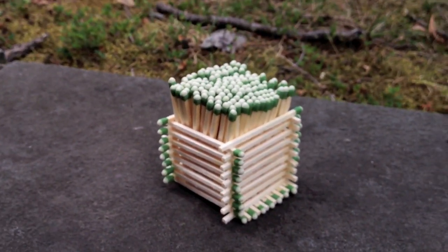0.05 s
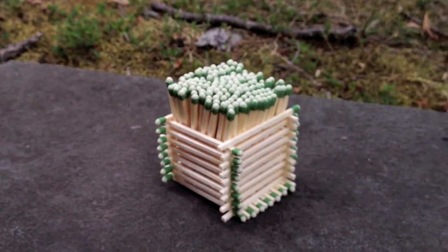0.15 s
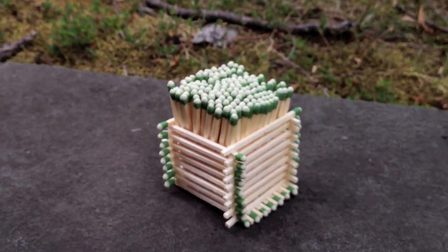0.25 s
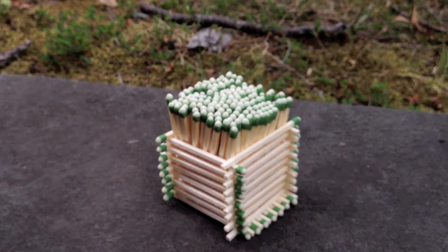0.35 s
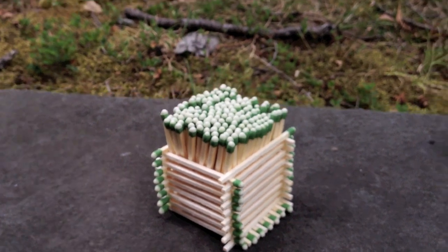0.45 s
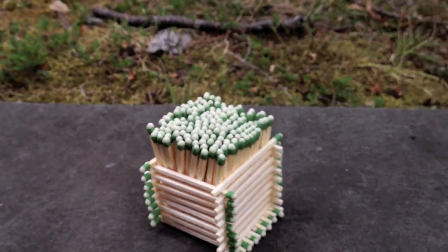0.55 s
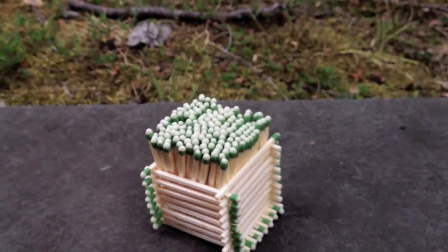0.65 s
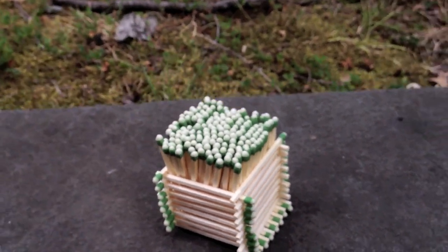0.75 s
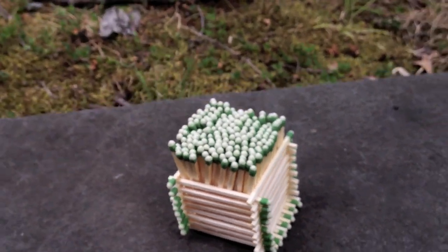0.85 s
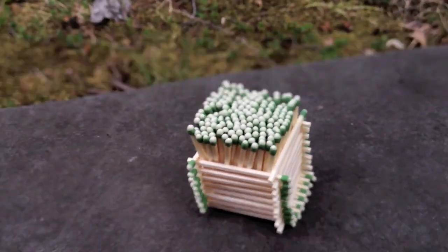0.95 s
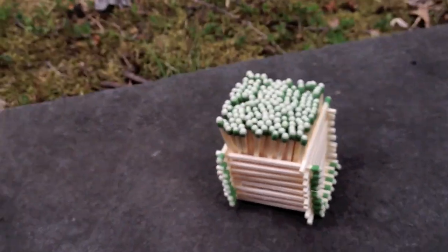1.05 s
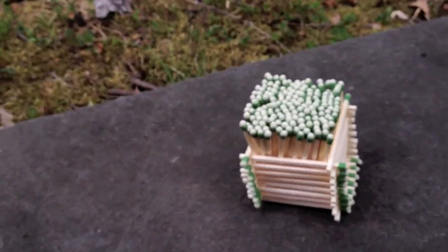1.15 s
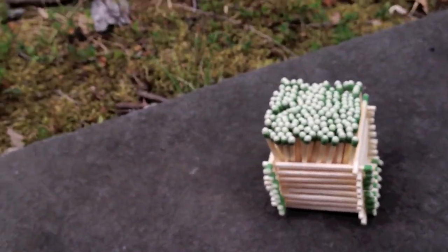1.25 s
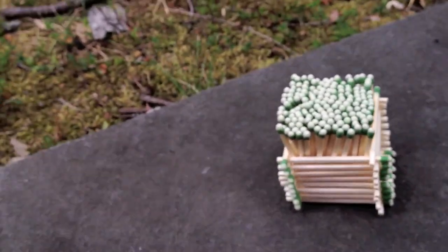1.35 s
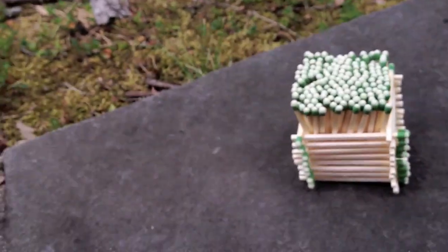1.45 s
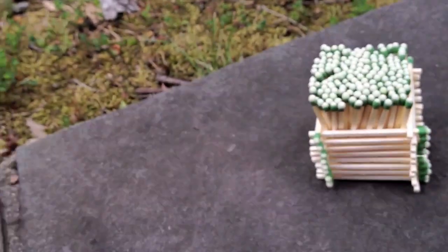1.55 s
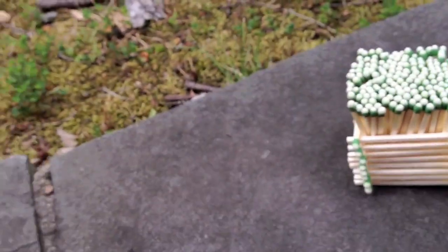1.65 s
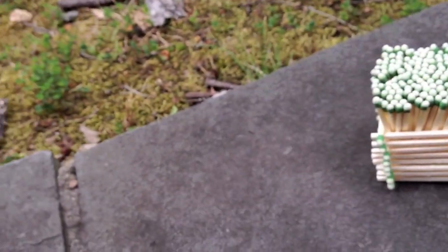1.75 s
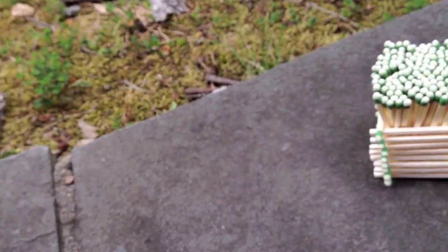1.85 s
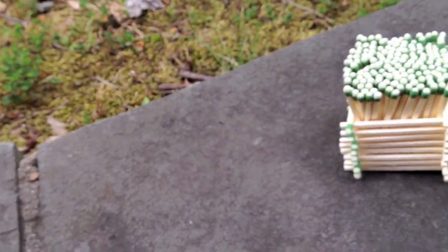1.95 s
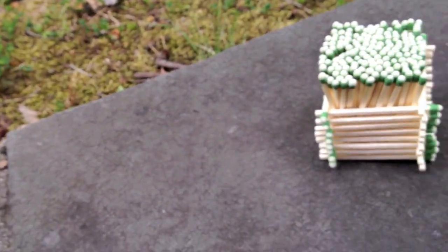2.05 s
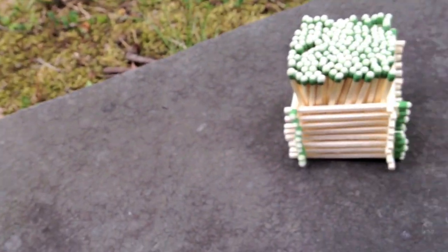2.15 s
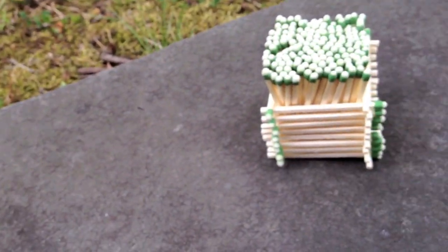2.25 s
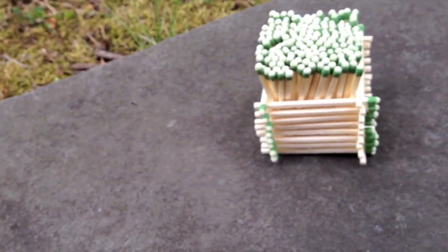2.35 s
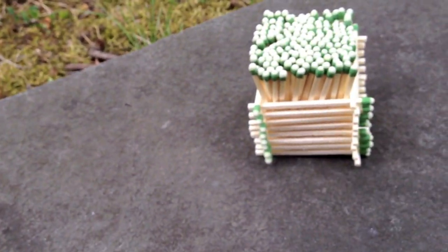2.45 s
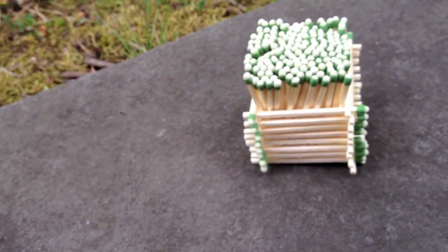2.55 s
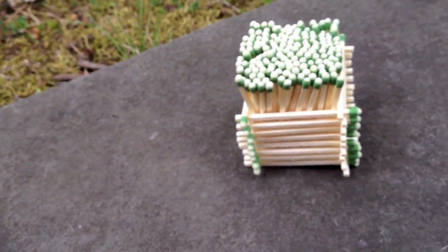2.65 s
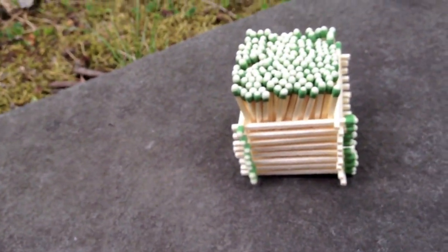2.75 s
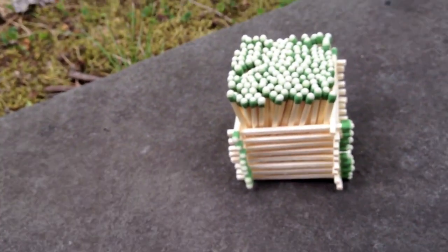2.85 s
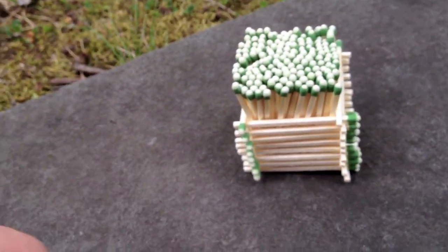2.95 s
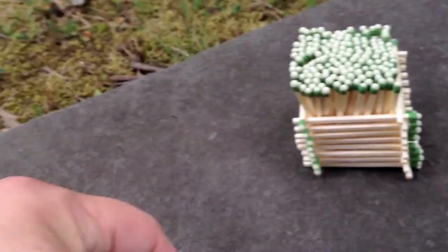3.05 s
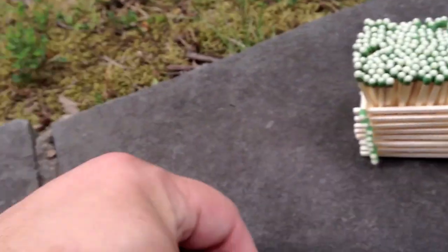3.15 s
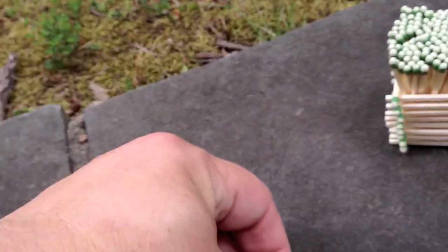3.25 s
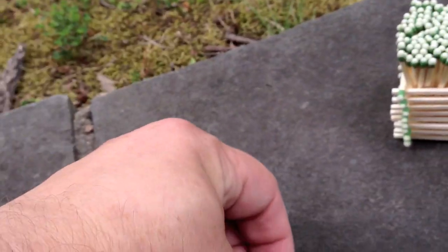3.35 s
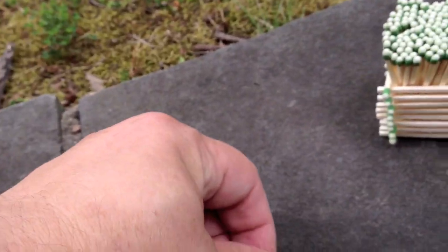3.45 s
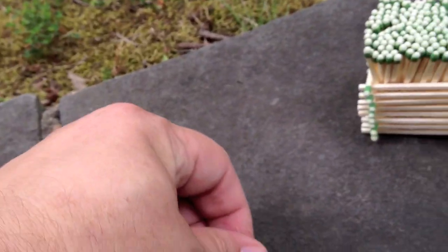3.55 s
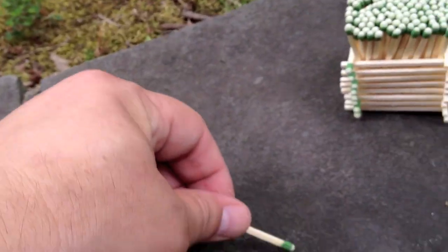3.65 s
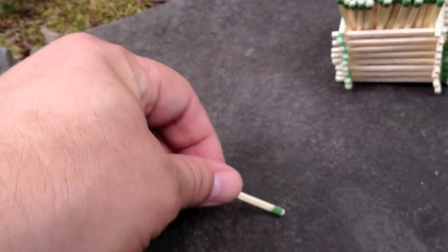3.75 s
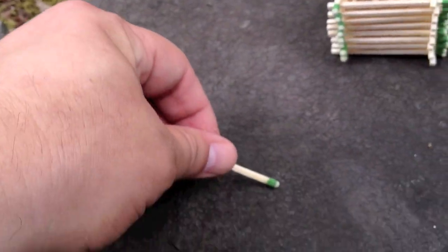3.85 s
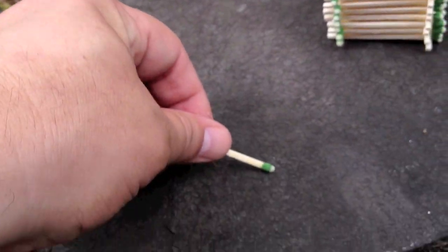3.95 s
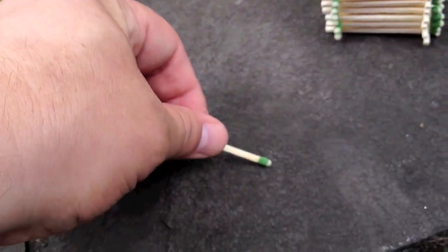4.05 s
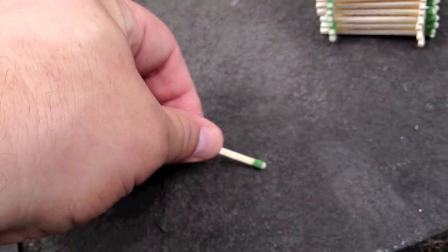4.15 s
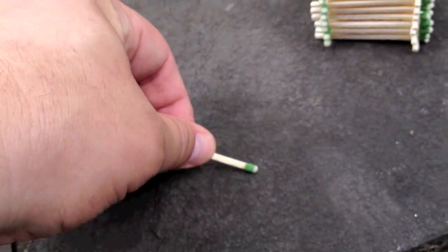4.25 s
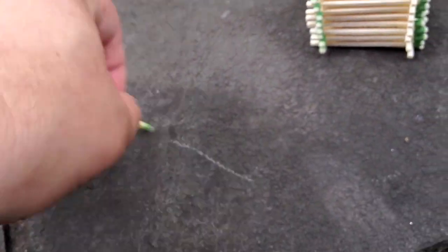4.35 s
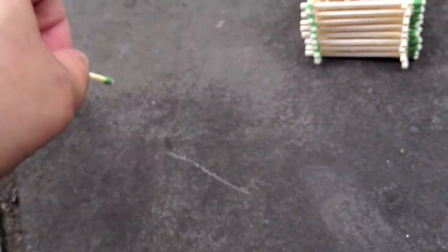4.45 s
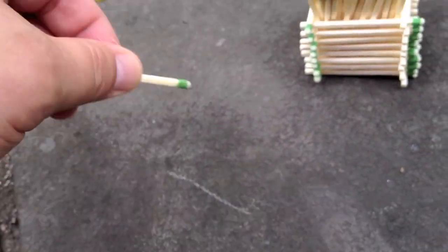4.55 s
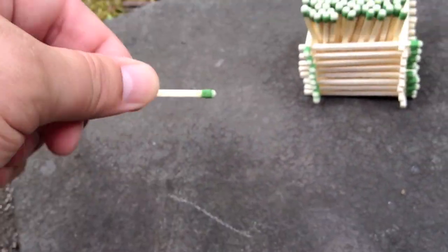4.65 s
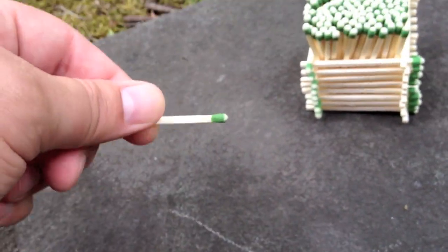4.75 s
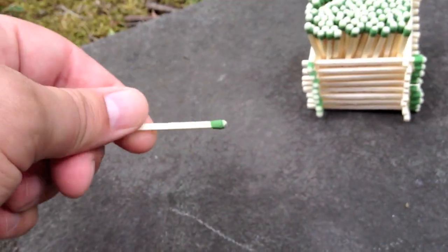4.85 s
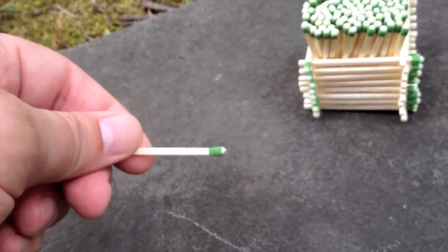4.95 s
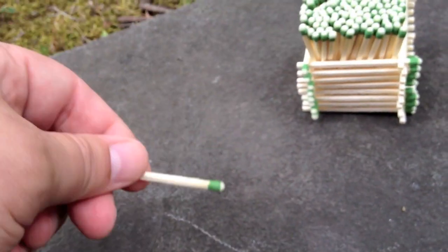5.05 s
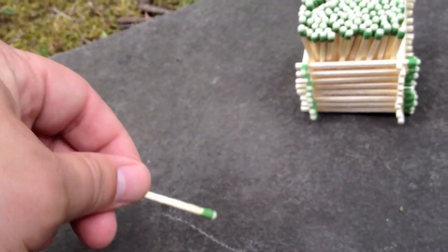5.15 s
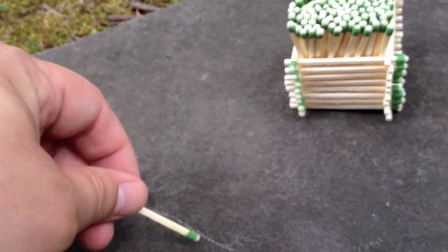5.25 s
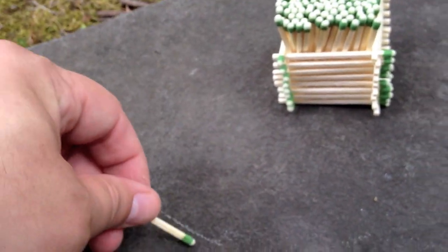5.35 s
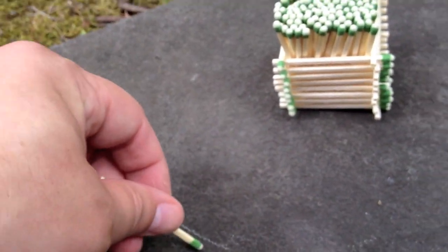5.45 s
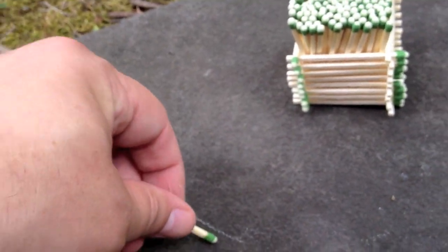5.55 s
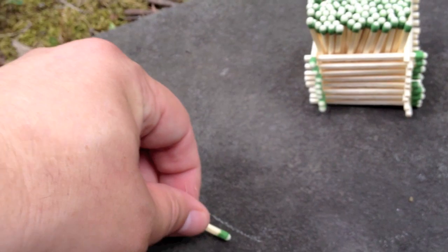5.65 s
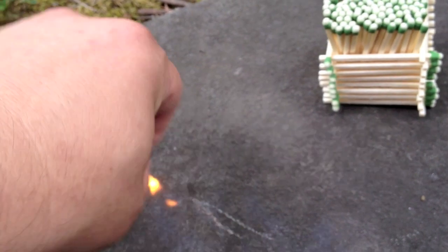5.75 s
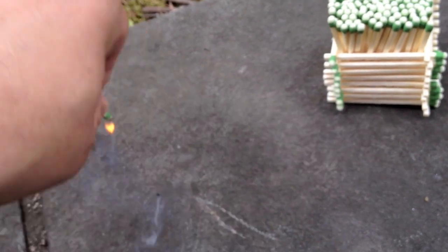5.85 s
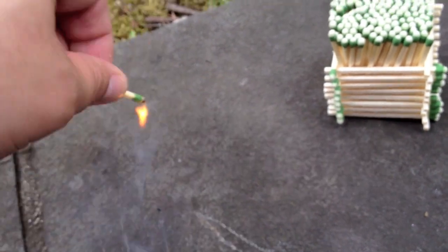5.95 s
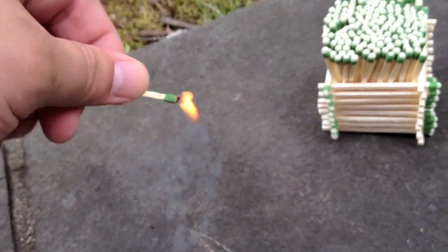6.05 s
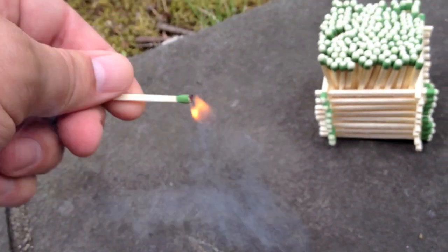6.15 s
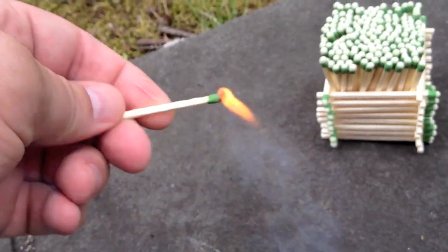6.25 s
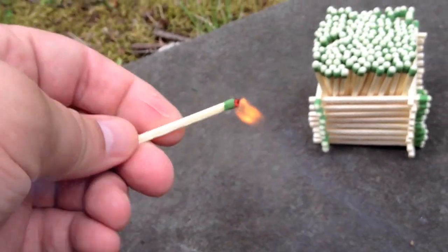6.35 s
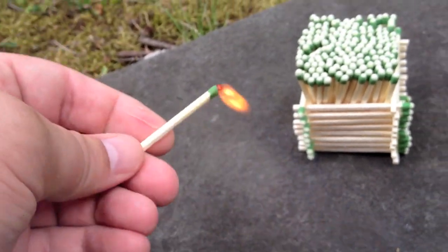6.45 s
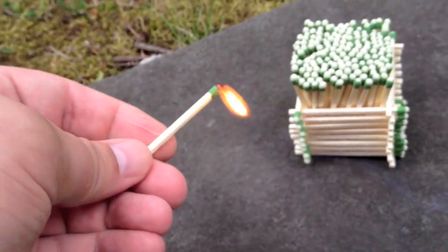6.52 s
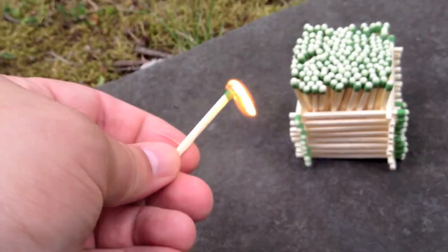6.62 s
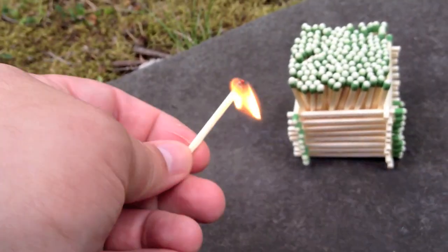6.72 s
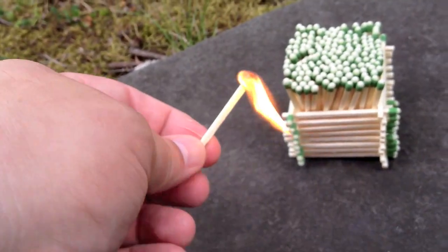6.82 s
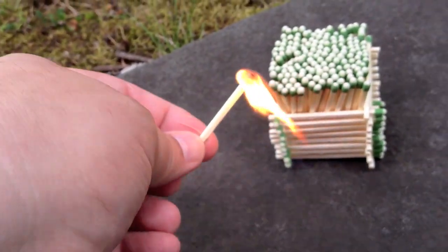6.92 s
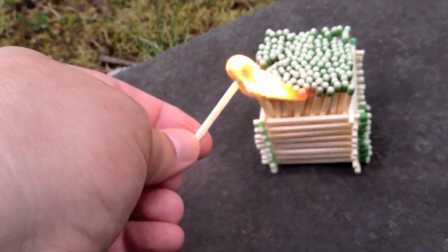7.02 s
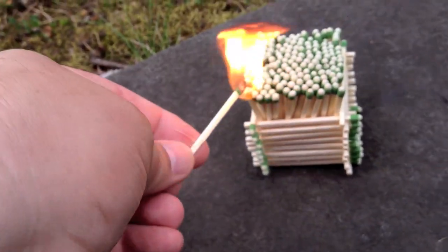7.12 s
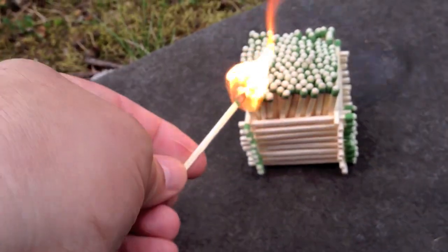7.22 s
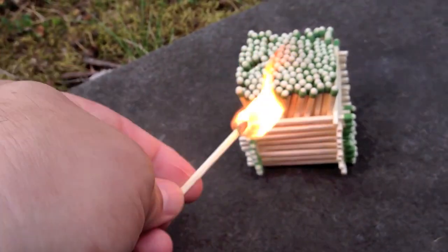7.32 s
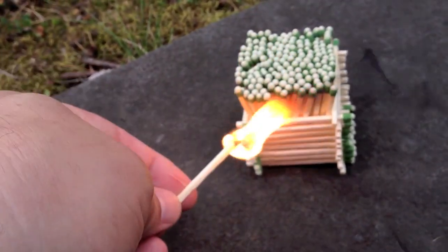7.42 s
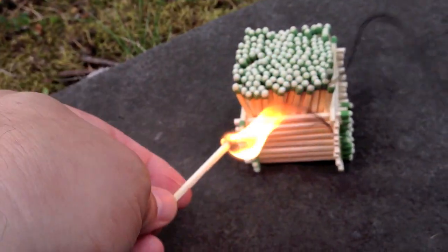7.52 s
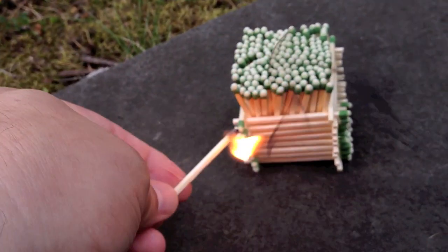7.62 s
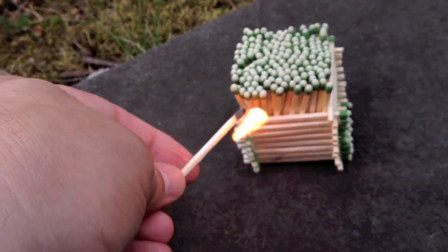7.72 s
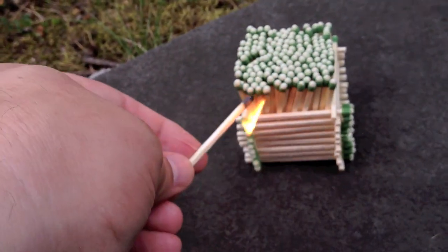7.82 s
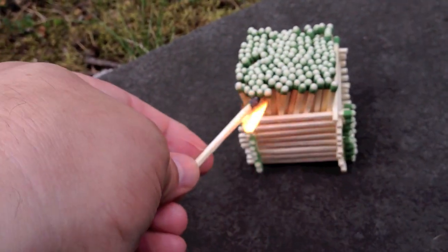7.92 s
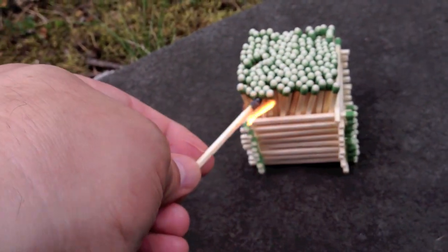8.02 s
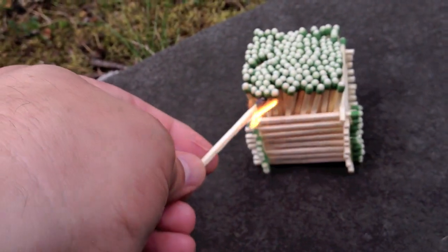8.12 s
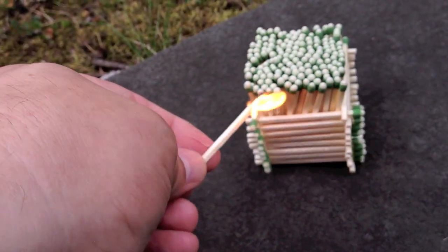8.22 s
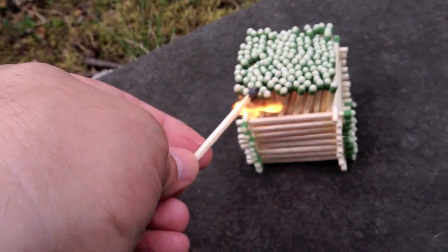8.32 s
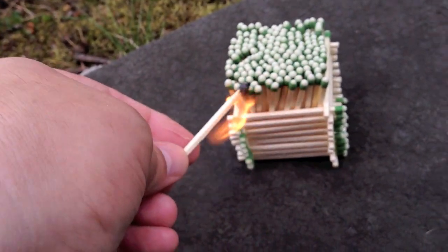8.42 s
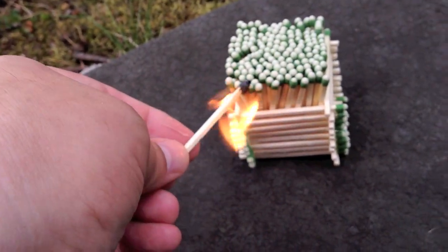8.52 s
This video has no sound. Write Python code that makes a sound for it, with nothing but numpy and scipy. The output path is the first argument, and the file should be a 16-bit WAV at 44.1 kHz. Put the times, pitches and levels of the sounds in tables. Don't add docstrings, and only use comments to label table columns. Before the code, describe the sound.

A high insect band, distant power-tool whine, leaf rustle and faint bird whistles fill an open yard. After a small cluster of handling knocks come a light gritty scratch, a harder scrape and a very loud, clipping match strike that briefly ducks the background. Sharp spits and a thin gas hiss follow, then quiet fizz and scattered tiny pops, all close, dry and mono.

```python
import sys
import numpy as np
from scipy import signal
from scipy.fft import rfft, irfft, next_fast_len
from scipy.io import wavfile
from scipy.ndimage import uniform_filter1d, map_coordinates

SR = 44100
rng = np.random.default_rng(int(sys.argv[2]) if len(sys.argv) > 2 else 0)


def digitize_waveform(pressure):
    field = np.atleast_2d(pressure).T
    bounded = np.clip(field, -1, 1)
    quanta = np.round(bounded * 32767).astype(np.int16)
    wavfile.write(sys.argv[1], SR, quanta)


def boost(x):
    u = np.asarray(x, float) / 20
    return 10 ** u


N = 378378
TIME = np.arange(N) / SR

# (start [s], length [s], pull [Hz], recovery [s])
THROTTLE = (6.22, 1.6, 1880, .25)


def unit(x):
    return x / np.sqrt(np.mean(x ** 2) + 1e-20)


def curves(rows):
    s, *cols = np.transpose(rows)
    return [np.interp(TIME, s, c) for c in cols]


def wobble(rate):
    return map_coordinates(rng.standard_normal(int(N * rate / SR) + 4), [TIME * rate])


def coloured(x, spectrum):
    m = next_fast_len(N + 8192, True) // 2 * 2
    f, db = np.transpose(spectrum)
    gain = boost(np.interp(np.log(np.fft.rfftfreq(m, 1 / SR) + 1), np.log(f), db))
    cep = irfft(np.log(gain + 1e-6), m)
    cep[1:m // 2] *= 2
    cep[m // 2 + 1:] = 0
    return irfft(rfft(x, m) * np.exp(rfft(cep)), m)[:N]


def rush(spectrum, patchy_db):
    z = signal.stft(rng.standard_normal(N), nperseg=512)[2]
    field = uniform_filter1d(rng.standard_normal(z.shape), size=5, axis=0)
    field = uniform_filter1d(field, size=10, axis=1)
    patchy = signal.istft(z * boost(patchy_db * unit(field)), nperseg=512)[1]
    return unit(coloured(patchy, spectrum))


def grains(per_s, spread_db):
    chance, size, sign = rng.random(N), rng.exponential(size=N), rng.standard_normal(N)
    return (chance < per_s / SR) * boost(spread_db * np.minimum(size, 4)) * np.sign(sign)


def scratch():
    # (time [s], pressure [dB])
    strokes = [
        [(3.468, -69), (3.479, -40), (3.51, -46), (3.535, -48), (3.55, -60)],
        [(4.29, -54), (4.303, -50), (4.305, -28), (4.312, -42), (4.333, -44)],
        [(4.333, -34), (4.345, -35), (4.355, -21.5), (4.358, -22), (4.372, -30.5), (4.379, -23), (4.383, -27),
         (4.388, -43), (4.42, -54)],
        [(5.7335, -58), (5.735, -10), (5.739, -20), (5.742, -32), (5.75, -42)],
        [(5.7505, -42), (5.752, -8), (5.757, -16.5), (5.765, -16), (5.771, -12.5), (5.776, -33), (5.79, -44.5),
         (5.805, -41.5), (5.83, -50)],
    ]
    body_shares = [0.11, 0.11, .16, 0.66, 0.92]
    # (frequency [Hz], level [dB per Hz])
    grit_tone = [(180, -46), (300, -3), (399, -54), (1220, -10), (2810, -4.5), (4640, 5), (5680, 4.5),
                 (14000, 3.5), (15500, 2), (16300, -41)]
    # (frequency [Hz], level [dB per Hz])
    stick_tone = [(60, -37), (300, -13), (600, -2), (1500, -5.5), (2600, -1.5), (4300, 1), (5500, -6),
                  (6500, 1), (9500, -8), (13000, 1.5), (15200, -3), (16300, -21)]
    slips = boost(1.8 * wobble(500))
    grit = slips * (unit(grains(per_s=4400, spread_db=3.0)) + 1.2 * rng.standard_normal(N))
    bright, dull = unit(coloured(grit, grit_tone)), unit(coloured(grit, stick_tone))
    out = np.zeros(N)
    for rows, share in zip(strokes, body_shares):
        pressure_db, = curves(rows)
        inside = (TIME > rows[0][0]) & (TIME < rows[-1][0])
        out += inside * boost(pressure_db) * ((1 - share) * bright + share * dull)
    return out


def snaps():
    # (time [s], peak [dB], low part [dB])
    grit_snaps = [(1.79, -19.5, -17), (2.5694, -23, -21), (3.479, -23, -16), (3.484, -22, -27),
                  (3.4924, -33, -20), (3.498, -31, -11), (3.5034, -16, -24), (3.5124, -19, -28),
                  (3.517, -34, -12), (4.3028, -25, -30), (4.316, -34, -13), (4.347, -3, -29),
                  (4.35, -17, -12), (4.356, 4, -29), (4.3755, -2, -21), (4.3805, 1, -23), (5.34, -25, -17),
                  (5.734, 0, -15), (5.738, -22, -16), (5.75, 3, -15), (5.7572, -1.5, -29), (5.7627, 0, -36),
                  (5.7646, 6, -18), (5.7673, -5.5, -12)]
    # (time [s], peak [dB], low part [dB])
    spits = [(5.7994, -20, -22), (5.8024, -19, -23), (5.8094, -33, -20), (5.949, -24, -24),
             (6.0025, -29, -23), (6.11, -22, -21), (6.197, -16, -18), (6.302, -18, -35),
             (6.352, -18.5, -14.5), (6.3672, -24, -11), (6.3787, -3, -27), (6.39, -25, -25),
             (6.4188, -13, -29)]
    high_tone = [(2000, -24), (4000, -5), (6000, -1.0), (8500, -0.5), (10000, -2.5), (13000, 1.5),
                 (15300, -4), (16300, -7)]
    low_tone = [(200, -14), (700, -5), (2500, 2), (4500, -3), (9000, -49.5)]
    low, high, t = np.zeros(N + SR), np.zeros(N + SR), np.arange(SR // 20) / SR
    for s, peak_db, low_db in grit_snaps + spits:
        burst = 0.2 * rng.standard_normal(len(t)) * boost(-60 * t / 0.0084)
        burst[0] = 1
        at = round((s + 0.0011) * SR)
        high[at:][:len(t)] += boost(peak_db + 0.5) * burst
        low[at:][:len(t)] += boost(peak_db + low_db + 19.0) * burst
    return coloured(high[:N], high_tone) + coloured(low[:N], low_tone)


def fizz():
    # (time [s], level [dB])
    fizz_level = [(5.8, -76), (5.95, -57.5), (6.15, -57.5), (6.9, -59), (7.24, -56), (7.4, -53),
                  (7.48, -68), (8.2, -57.5), (8.58, -54.5)]
    level_db, = curves(fizz_level)
    t = np.arange(SR // 50) / SR
    tiny_pops = signal.fftconvolve(np.abs(grains(per_s=500, spread_db=1.5)), boost(-60 * t / 0.015))[:N]
    hiss = unit((unit(tiny_pops) + 0.36) * rng.standard_normal(N))
    return boost(level_db) * (TIME > fizz_level[0][0]) * hiss


def pops():
    # (time [s], peak [dB], thud [dB])
    head_pops = [(7.058, -34, -9), (7.092, -38, -15), (7.115, -39, -10), (7.137, -33, -6), (7.168, -35, -2),
                 (7.207, -35, -9), (7.222, -29.5, -10), (7.245, -33.5, -11), (7.269, -28, -13),
                 (7.276, -30, -14), (7.29, -33, -19), (7.306, -31, -12), (7.319, -39, -2),
                 (7.349, -37.5, 4), (7.372, -28, -18), (7.391, -22, -29), (7.397, -30, -22),
                 (7.402, -27, -24), (7.443, -31, -4), (7.457, -33, -15), (7.509, -32, -12), (7.517, -37, 0),
                 (7.923, -27.5, -10), (8.236, -29.5, -8), (8.296, -31, -14), (8.397, -46, -12),
                 (8.544, -25, -28), (8.552, -30, -21)]
    out, t = np.zeros(N), np.arange(SR // 50) / SR
    for s, peak_db, thud_db in head_pops:
        pop = boost(peak_db - 12.0 - 60 * t / 0.022) * rng.standard_normal(len(t))
        pop[0] = boost(peak_db - 13)
        pop = pop + boost(thud_db + 9.5) * uniform_filter1d(pop, size=14)
        at = round(s * SR)
        out[at:][:len(t)] += pop[:N - at]
    return out


def gas_jet():
    # (time [s], hiss [dB])
    flare = [(5.76, -65), (5.95, -61), (6.19, -57), (6.38, -63), (6.45, -64.5), (7.2, -67)]
    # (time [s], delay [ms])
    bounce = [(5.8, 0.32), (6.05, .17), (6.4, .222), (6.75, 0.206), (7.2, 0.18)]
    # (frequency [Hz], level [dB per Hz])
    jet_tone = [(7000, -16), (9500, -2.5), (11500, -3), (15300, 1), (15500, -40), (16000, -120)]
    burning = (TIME > flare[0][0]) * (TIME < flare[-1][0])
    jet = burning * boost(curves(flare)[0]) * rush(jet_tone, patchy_db=4.0)
    return jet - 0.6 * np.interp(TIME - curves(bounce)[0] / 1000, TIME, jet)


def flame():
    # (frequency [Hz], level [dB])
    spark_tone = [(300, -5.5), (800, 3), (1800, -1.5), (2400, -15), (3000, 1), (4300, 4.5), (5400, 1),
                  (7000, -3), (10000, -16), (13000, -8.5), (15300, -9), (15600, -50), (16200, -120)]
    return boost(5.0) * coloured(fizz() + pops(), spark_tone) + gas_jet()


def knocks():
    # (time [s], thump [dB], ring [Hz], ring [dB], click [dB])
    finger_knocks = [
        (0.839, -25, 602, -27, -40),
        (0.926, -36, 1006, -25, -36),
        (0.9483, -36, 1400, -32, -41),
        (.971, -19.5, 890, -19, -18.5),
        (1.0003, -25, 700, -24.5, -34),
        (4.3637, -50, 1200, -16, -40),
    ]
    out, t = np.zeros(N), np.arange(SR // 20) / SR
    for s, thump_db, hz, ring_db, click_db in finger_knocks:
        thump = boost(thump_db - 60 * t / 0.01) * np.sin(2 * np.pi * 230 * t)
        ring = boost(ring_db - 60 * t / 0.004) * np.sin(2 * np.pi * hz * t)
        click = boost(click_db - 60 * t / 0.007) * uniform_filter1d(rng.standard_normal(len(t)), size=3)
        out[round(s * SR):][:len(t)] += thump + ring + click
    return coloured(out, [(40, -51), (120, -7), (200, -0.5), (9000, 2.0)])


def insects():
    # (frequency [Hz], level [dB])
    song_tone = [(5800, -52), (6500, -22), (6850, -18), (7320, -7), (7820, -0.5), (8250, -6.5), (8480, -22),
                 (8800, -49), (10000, -120)]
    pulses = grains(per_s=4000, spread_db=-3.5)
    level_db = -48 + 0.2 * wobble(1.87) + 0.79 * wobble(30)
    return boost(level_db) * unit(coloured(pulses, song_tone))


def sag(s, length, pull_hz, back):
    held = np.clip(TIME - s, 0, length)
    return pull_hz * (1 - np.exp(-held / 0.25)) * np.exp(-np.maximum(TIME - s - length, 0) / back)


def machine_whine():
    # (start [s], length [s], pull [Hz], recovery [s])
    loads = [
        (-.2, .5, 458.2, .28),
        (1.089, .15, 543, .25),
        (1.782, .32, 338, .3),
        (3.771, .43, 649.7, .38),
    ]
    # (multiple of the shaft's rate, level under the whine [dB])
    shaft_orders = [(1, -7.5), (2, -13), (3, -8)]
    # (delay [s], level [dB])
    echoes = [
        (.045, 2),
        (0.089, -3),
        (0.149, -12),
    ]
    full_hz, whine_db = 4638, -62.5
    load_hz, idle_hz = sum(sag(*row) for row in loads), sag(*THROTTLE)
    hz = full_hz - load_hz - idle_hz
    start, length, pull_hz, back = THROTTLE
    idling = sag(start + 0.07, length, pull_hz, back) / pull_hz
    db = whine_db + 11 * (load_hz + 0.38 * idle_hz) / 1000
    db = db - 19 * idling ** 7 + 0.65 * wobble(3.2)
    unsteady_hz = 0.08 * (full_hz - hz) * wobble(120)
    phase = 2 * np.pi * np.cumsum(hz + unsteady_hz) / SR
    fuzz = (1.5 + wobble(150)) * np.sin(phase) + wobble(150) * np.cos(phase)
    octave_down = boost(-15) * wobble(200) * np.sin(phase / 2)
    octave_up = boost(-12 + 5 * wobble(9)) * np.sin(2 * phase)
    direct = boost(db - 4.5 + 2.3 * wobble(17)) * (fuzz + octave_down + octave_up)
    shaft = sum(boost(order_db + 4.1 * wobble(4)) * np.sin(k * phase / 9) for k, order_db in shaft_orders)
    direct = direct + boost(whine_db - 11 * (full_hz - hz) / 1000) * shaft
    out = direct.copy()
    for delay_s, level_db in echoes:
        late = np.pad(direct, (round(delay_s * SR), 0))[:N]
        out += boost(level_db + 2.5 * wobble(5.4)) * late
    return out


def machine_drone():
    # (frequency [Hz], level [dB per Hz])
    drone_tone = [(700, -23.5), (1100, -8.5), (1500, -1), (2050, 3.5), (3000, -1), (4300, -2.5),
                  (5400, -8.5), (6600, -6.5), (7500, -0.5), (9000, -59), (12000, -120)]
    level_db = -50.5 - 3 * sag(*THROTTLE) / 1000 + 0.2 * wobble(3.13)
    return boost(level_db) * rush(drone_tone, patchy_db=1.42)


def bird():
    # (time [s], length [s], top [Hz], sag at the ends [Hz], level [dB])
    calls = [(0.274, 0.079, 1536, 246, -56), (0.486, 0.07, 1380, 60, -59), (5.548, .11, 1638, 204, -56),
             (6.19, 0.078, 1600, 202, -63), (6.79, 0.066, 1530, 149.6, -57.5),
             (7.572, 0.057, 1520, 148, -57), (8.148, 0.076, 1560, 151, -53), (1.787, 0.026, 2900, 50, -55),
             (1.851, 0.014, 3190, 200, -53), (1.888, 0.026, 3100, 50, -60), (3.395, 0.02, 893, 60, -54.5)]
    out, flutter = np.zeros(N), wobble(90)
    for s, length, top_hz, sag_hz, db in calls:
        at = round(s * SR)
        u = np.arange(round(length * SR)) / (length * SR)
        hz = top_hz - sag_hz * (2 * u - 1) ** 2
        swell = boost(db + 7 + 1.5 * flutter[at:][:len(u)]) * np.sqrt(np.sin(np.pi * u))
        out[at:][:len(u)] += swell * np.sin(2 * np.pi * np.cumsum(hz) / SR)
    return out


def wind():
    # (middle [s], half width [s], swell [dB])
    gusts = [(0, 0.14, 4), (.55, 0.23, 9), (.9, 0.13, 2.5), (1.31, .14, 7.5), (1.87, 0.14, 5.5),
             (2.53, 0.076, 6), (4, 0.56, 2.5), (7.3, 0.15, 3), (8.4, 0.28, 1.5)]
    # (time [s], strength [dB])
    leaf_wind = [(0, -59.5), (.55, -54), (1.12, -51.5), (1.55, -52), (1.9, -58), (2.12, -54.5),
                 (2.4, -62.5), (2.77, -57), (3.18, -64), (4, -60), (4.5, -59.5), (5.6, -62), (6.6, -67),
                 (7.3, -59), (7.8, -67.5), (8.15, -69), (8.3, -64), (8.58, -53)]
    # (frequency [Hz], level [dB per Hz])
    gust_tone = [(250, -25.5), (400, -4), (520, -3.5), (800, -4.5), (1200, -11.5), (2500, -33.5),
                 (6000, -120)]
    # (frequency [Hz], level [dB per Hz])
    leaf_tone = [(5000, -4), (8300, -7), (8700, -2.5), (10000, -7.5), (11000, -6), (13000, -6.5),
                 (15300, -7.5), (15500, -40), (16000, -120)]
    gust_db = -57.5 + sum(db * np.exp(-((TIME - s) / half) ** 2) for s, half, db in gusts)
    rumble = boost(gust_db + 0.22 * wobble(25)) * rush(gust_tone, patchy_db=2.0)
    return rumble + boost(curves(leaf_wind)[0]) * rush(leaf_tone, patchy_db=0.8)


def traffic_hum():
    # (frequency [Hz], level [dB per Hz])
    hum_tone = [(15, -89), (25, -52), (75, -22.5), (108, -6), (177, -1), (246, -0.5), (337, -12.5),
                (450, -18.5), (580, -53), (990, -120)]
    return boost(-47.5 + 0.84 * wobble(2.76) + 0.27 * wobble(12)) * rush(hum_tone, patchy_db=0.45)


def ducking():
    # (time [s], depth [dB], recovery [s])
    ducks = [
        (4.358, 2, 1.03),
        (5.74, 6.5, 1.1),
    ]
    return -sum(db * (TIME > s) * np.exp(-np.abs(TIME - s) / back) for s, db, back in ducks)


def scene():
    far = insects() + machine_whine() + machine_drone() + wind() + traffic_hum()
    mix = scratch() + snaps() + flame() + knocks() + bird() + boost(ducking()) * far
    return np.array([mix, mix])


def empty_faint_bands(x, margin_db, low_hz, high_hz):
    hz, _, z = signal.stft(x, SR, nperseg=1024)
    power = uniform_filter1d(uniform_filter1d(np.abs(z) ** 2, size=5, axis=0), size=3, axis=1)
    insect_power = uniform_filter1d(power[(hz > 7400) & (hz < 8200)].mean(axis=0), size=9)
    slope_db = -2.2 * (hz[:, None] - low_hz) / 1000
    in_band = ((hz > low_hz) & (hz < high_hz))[:, None]
    faint = (power < insect_power * boost(margin_db + slope_db) ** 2) & in_band
    return signal.istft(z * ~faint, SR, nperseg=1024)[1][:N]


def low_pass(x):
    return signal.sosfilt(signal.butter(12, 16410, fs=SR, output="sos"), x)


def record(dry):
    clipped = np.clip(dry[0], -1, 1)
    mono = empty_faint_bands(clipped, margin_db=-25.5, low_hz=8560, high_hz=11180)
    return low_pass(np.array([mono, mono]))


dry = scene()
out = record(dry)
digitize_waveform(out)
```